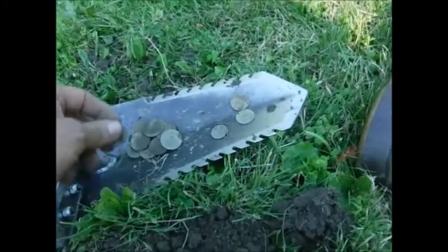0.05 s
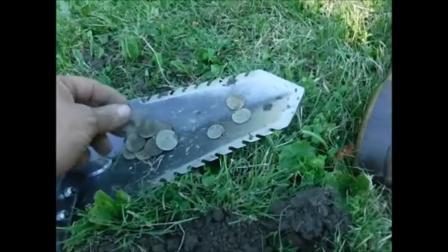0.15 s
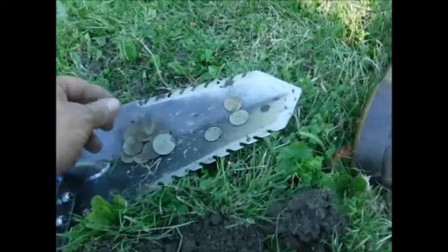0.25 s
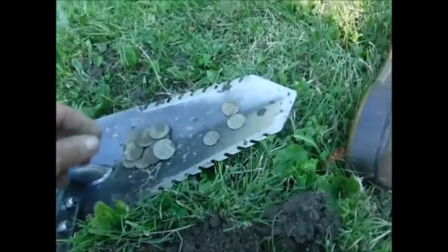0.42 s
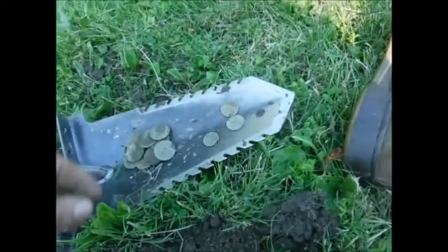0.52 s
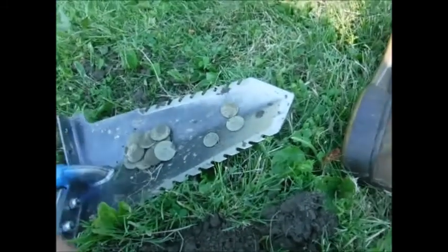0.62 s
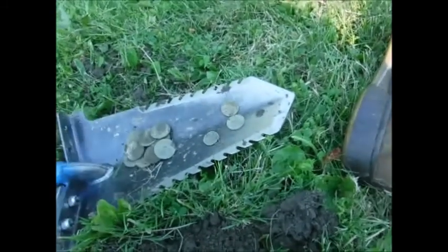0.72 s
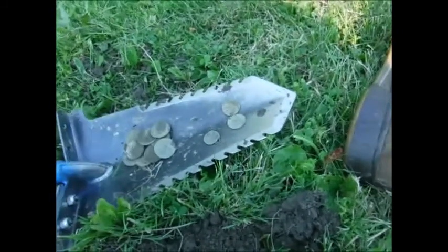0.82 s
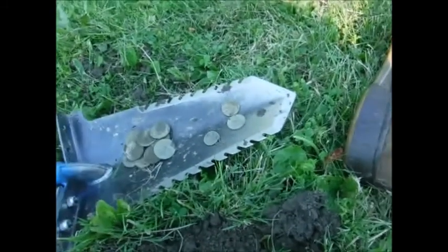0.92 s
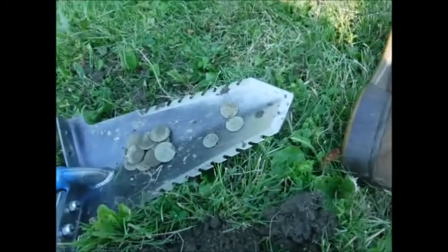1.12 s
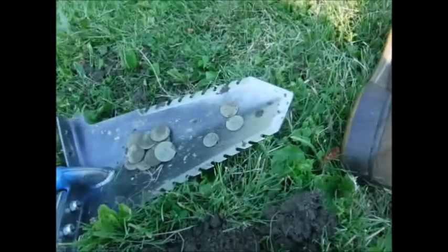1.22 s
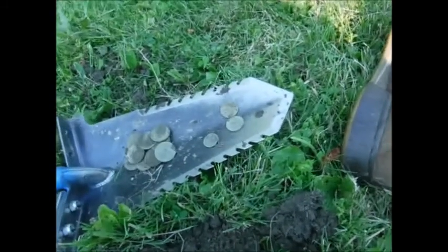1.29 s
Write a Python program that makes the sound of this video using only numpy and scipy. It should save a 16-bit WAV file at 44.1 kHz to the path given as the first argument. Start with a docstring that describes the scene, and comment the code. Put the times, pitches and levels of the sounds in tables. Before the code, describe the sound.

A coin clinks sharply on a steel digging blade, skips and lands harder among loose coins, ringing briefly on one high note. The close clinks overload the microphone slightly. Faint birds then chirp over soft outdoor hiss.

```python
"""In a park, a coin drops onto a small heap of coins on a steel digging blade lying in the grass.
It strikes, skips and lands harder. Each hit makes the blade and coins ring, and loose coins clash.
The coin sings one high note as it bounces, then settles; the close clinks overload the microphone.
Two soft thuds go into the ground. Behind it all are small birds, outdoor hiss and a far motor."""
import sys
import numpy as np
from scipy import signal
from scipy.fft import rfft, irfft
from scipy.io import wavfile
from scipy.ndimage import uniform_filter1d

SR = 44100
rng = np.random.default_rng(int(sys.argv[2]) if len(sys.argv) > 2 else 0)


def int16_out(signal):
    """Quantize to a 16-bit WAV file."""
    q = np.round(np.clip(np.atleast_2d(signal).T, -1, 1) * 32767)
    wavfile.write(sys.argv[1], SR, q.astype(np.int16))


N = 59535

# the notes that the blade and its coins ring with
# (pitch [Hz], level when hit on bare steel [dB], level when hit on the heap [dB], time to fade 60 dB [s])
METAL_NOTES = [(970, -38, -21, .04), (1061, -33, -34, .14), (1725, -37, -27, .12), (1781, -26, -38, .08),
               (2094, -47, -32, .26), (2740, -29, -24, .07), (3050, -19, -12, .043), (3405, -39, -27, .14),
               (3633, -16, -21, .055), (4137, -10, 5, .032), (4312, -17, -11, .07), (4318, -40, -34, .27),
               (4685, -13, -11, .042), (4850, -38, -35, .27), (4945, -20, -18, .07), (5130, -9, -3, .056),
               (5237, -21, -8, .05), (5530, -19, -15, .05), (5612, -41, -23, .12), (5715, -32, -7, .05),
               (5840, -18, -22, .04), (5997, -47, -35, .27), (6262, -37, -2, .038), (7000, -45, -25, .09),
               (8055, -40, -27, .18), (8612, -25, -42, .11), (8880, -27, -40, .13), (8974, -15, -30, .1),
               (9079, -34, -27, .46), (9318, -33, -36, .32), (9750, -27, -12, .065), (10350, -34, -20, .05),
               (11680, -30, -48, .11), (12140, -28, -45, .05), (14600, -43, -56, .15),
               (15400, -33, -26, .055)]
# each hit of the coin (time [s], ring level [dB], clash level [dB], place [0 steel to 1 heap],
# share of the ring time [0 to 1], dullness [dB per octave])
COIN_HITS = [(.2409, 0, -6, 0, 1, 0), (.2457, -20, -16, 0, .4, 0), (.278, -12, -28, .1, .75, 8),
             (.288, -22, -33, .1, .9, 8), (.3229, -14, -20, .7, .1, 2), (.3257, -13, -10, .4, .2, 2.5),
             (.3313, 1, -1.5, 1, 1, 0), (.3358, -13, -9, 1, .4, 0), (.3395, -22, -17, .8, .35, 1),
             (.365, -27, -21, .7, .2, 2), (.3702, -24, -27, .6, .7, 4)]
# tone of loose coins clashing (frequency [Hz], relative level [dB])
CLASH_TONE = [(200, -19), (600, -21.5), (1000, -13.5), (2200, -13), (4300, 1.5), (6200, 3), (7500, 0),
              (10000, -0.5), (12500, -18), (15500, -9)]
# tone of many weak metal notes crowded together (frequency [Hz], relative level [dB])
SHIMMER_TONE = [(300, -33), (700, -37), (1800, 1.5), (2400, -10), (4500, -14), (6500, -6), (8500, 7),
                (10500, -4), (12800, -8), (15500, -22)]
# soft thuds into the ground (time [s], pitch [Hz], level [dB])
GROUND_THUDS = [(0.3343, 99, -36), (1.182, 80, -42)]
# thin bird chirps (time [s], length [s], start pitch [Hz], end pitch [Hz], level [dB])
BIRD_CHIRPS = [(.504, 0.024, 6900, 4150, -43), (0.622, .024, 6400, 4050, -44),
               (.628, 0.041, 2950, 2950, -48), (0.764, .009, 6300, 4460, -38.5),
               (0.915, .011, 6700, 5870, -46)]
# raspy bird calls (time [s], length [s], start pitch [Hz], end pitch [Hz], level [dB])
BIRD_RASPS = [(0.662, 0.085, 5220, 3230, -46.5), (0.816, 0.0545, 4400, 4570, -42.5),
              (0.841, .06, 4400, 3026, -42), (1.009, 0.076, 5200, 5010, -51)]
# tone of the outdoor hiss (frequency [Hz], relative level [dB])
HISS_TONE = [(25, -22), (45, -15.5), (100, -10.5), (170, -11.5), (220, -15), (400, -17.5), (800, -15.5),
             (1050, -13.5), (1600, -10.5), (2100, -15.5), (2900, -13), (4900, -8), (6800, -16),
             (10000, -20.5), (12500, -27.5), (16000, -28.5)]
# the notes in the motor's hum (pitch [Hz], level at the start [dB])
MOTOR_NOTES = [(81, -66.5), (123, -71.5), (162, -68.5), (242.5, -74)]


def coin_hit(ring_db, clash_db, place, ring_share, dullness, pivot_hz=4500):
    """One hit sets the metal ringing, with a short clash of loose coins and a shimmer of weak notes."""
    t = np.arange(SR // 2) / SR
    hz, steel_db, heap_db, fade_s = np.array(METAL_NOTES).T[:, :, None]
    note_db = (1 - place) * steel_db + place * heap_db
    note_db -= dullness * np.log2(np.maximum(hz / pivot_hz, .5))  # dull hits favour the low notes
    waves = np.sin(2 * np.pi * (hz * t + rng.random(hz.shape)))
    ring = (gain(note_db - 60 * t / (fade_s * ring_share)) * waves).sum(0)

    def burst(tone, burst_s):
        """A puff of noise that fades 60 dB in burst_s; a dull hit has less treble."""
        hiss = noise(lambda f: gain(level_at(tone, f) - 2 * dullness * np.log2(np.maximum(f / pivot_hz, 1))))
        return hiss[:len(t)] * gain(-60 * t / burst_s)

    clash = burst(CLASH_TONE, burst_s=.021 * np.sqrt(ring_share))
    shimmer = gain(-16) * burst(SHIMMER_TONE, burst_s=.095 * ring_share)
    bass_cut = signal.butter(2, 310, "high", fs=SR)  # each hit holds little sound below 310 Hz
    return signal.lfilter(*bass_cut, gain(ring_db) * ring + gain(clash_db) * (clash + shimmer))


def bouncing_coin(hz=9323, takeoff_s=.3325, landing_s=.3642):
    """The coin rings with its own pure note while in the air; touching down quickly stills it."""
    t = np.arange(N) / SR
    since_takeoff, since_landing = np.maximum(t - takeoff_s, 0), np.maximum(t - landing_s, 0)
    fade_in = np.minimum(since_takeoff / .0092, 1)
    free_db = -9.5 - 60 * since_takeoff
    # landing takes 1.5 dB at once, then an extra 60 dB every 0.11 s
    lost_db = 1.5 * np.minimum(since_landing / .001, 1) + 60 * since_landing / .11
    return fade_in * gain(free_db - lost_db) * np.sin(2 * np.pi * hz * t)


def ground_thud(hz, db, decay_s=.004):
    """A low push that the soil soaks up at once."""
    t = np.arange(SR // 10) / SR
    push = t / decay_s * np.exp(1 - t / decay_s)
    return gain(db) * push * np.sin(2 * np.pi * hz * t)


def bird_call(length_s, start_hz, end_hz, db, raspy):
    """A short whistle, usually sliding down; a fast random flutter makes it raspy."""
    progress = np.arange(0, length_s, 1 / SR) / length_s
    hz = start_hz * (end_hz / start_hz) ** progress
    whistle = np.sin(2 * np.pi * np.cumsum(hz) / SR)
    if raspy:
        whistle *= wobble(rate_hz=510)[:len(whistle)] * np.sqrt(2)
    return gain(db) * np.sin(np.pi * progress) * whistle


def park_hiss(level_db=-46.5, patch_db=1.5):
    """Outdoor hiss, with drifting patches that are a little louder or softer."""
    hiss = noise(lambda f: gain(level_at(HISS_TONE, f)))
    grid = signal.stft(hiss, nperseg=512)[2]  # rows are frequencies, columns are moments
    patches = uniform_filter1d(rng.standard_normal(grid.shape), size=9, axis=0)
    patches = normalise(uniform_filter1d(patches, size=10, axis=1))
    patchy_hiss = signal.istft(grid * gain(patch_db * patches), nperseg=512)[1][:N]
    return gain(level_db) * normalise(patchy_hiss)


def far_motor(waver=.19, rise_db_per_s=4):
    """A far motor hums with a few low, wavering notes and slowly gets louder."""
    t = np.arange(N) / SR
    hum = np.zeros(N)
    for hz, db in MOTOR_NOTES:
        strength = gain(db) * np.sqrt(2) * (1 + waver * wobble(rate_hz=5.6))
        phase = 2 * np.pi * (hz * t + rng.random()) + waver * wobble(rate_hz=3.5)
        hum += strength * np.sin(phase)
    return gain(rise_db_per_s * t) * hum


def gain(db):
    """Turns decibels into a number to multiply a sound by."""
    return 10 ** (np.asarray(db) / 20)


def normalise(x):
    """Scales a signal to an average strength (rms) of 1."""
    return x / np.sqrt(np.mean(x ** 2) + 1e-20)


def level_at(tone, hz):
    """Reads the level in dB between the points of a tone table."""
    points_hz, db = np.transpose(tone)
    return np.interp(np.log(hz + 1), np.log(points_hz + 1), db)


def noise(shape):
    """Noise of strength 1; shape(Hz) says how much of each frequency it holds."""
    spectrum = rfft(rng.standard_normal(N)) * shape(np.fft.rfftfreq(N, 1 / SR))
    return normalise(irfft(spectrum, N))


def wobble(rate_hz):
    """Random ups and downs, mostly slower than rate_hz."""
    return noise(lambda f: 1 / (1 + (f / rate_hz) ** 4))


def add(mix, time_s, sound):
    """Mixes a sound in at the given time."""
    part = mix[round(time_s * SR):][:len(sound)]
    part += sound[:len(part)]


def scene():
    """The coin on the blade, with the park behind it."""
    mix = bouncing_coin() + park_hiss() + far_motor()
    for time_s, *hit in COIN_HITS:
        add(mix, time_s, coin_hit(*hit))
    for time_s, hz, db in GROUND_THUDS:
        add(mix, time_s, ground_thud(hz, db))
    for time_s, *call in BIRD_CHIRPS:
        add(mix, time_s, bird_call(*call, raspy=False))
    for time_s, *call in BIRD_RASPS:
        add(mix, time_s, bird_call(*call, raspy=True))
    return mix[None]


def record(dry):
    """A fast limiter turns loud clinks down, what gets past it overloads, and the top treble is cut."""
    limit_db, release_db_per_s, limit_share = 4, 1505, .56
    ceiling_db, hardness, top_hz = -.7, 9, 15850
    sound = signal.resample_poly(dry[0], 2, 1)  # twice the sample rate, for cleaner clipping
    level_db = 20 * np.log10(abs(sound) + 1e-9)
    fall_db = np.arange(len(sound)) / (2 * SR) * release_db_per_s
    peak_db = np.maximum.accumulate(level_db + fall_db) - fall_db  # jumps to each peak, then sinks
    excess_db = uniform_filter1d(np.maximum(peak_db - limit_db, 0), size=16)
    limited = sound / gain(limit_share * excess_db)
    clipped = limited / (1 + abs(limited / gain(ceiling_db)) ** hardness) ** (1 / hardness)
    treble_cut = signal.firwin(255, top_hz, window=("kaiser", 8), fs=SR)
    return signal.oaconvolve(signal.resample_poly(clipped, 1, 2), treble_cut, "same")[None]


dry = scene()
out = record(dry)
int16_out(out)
```